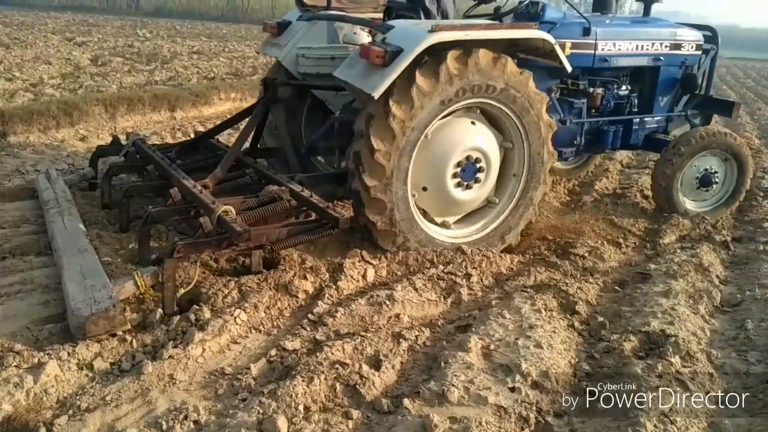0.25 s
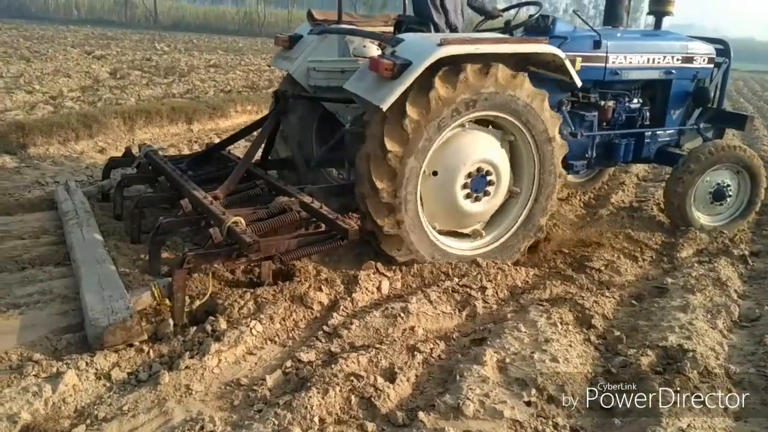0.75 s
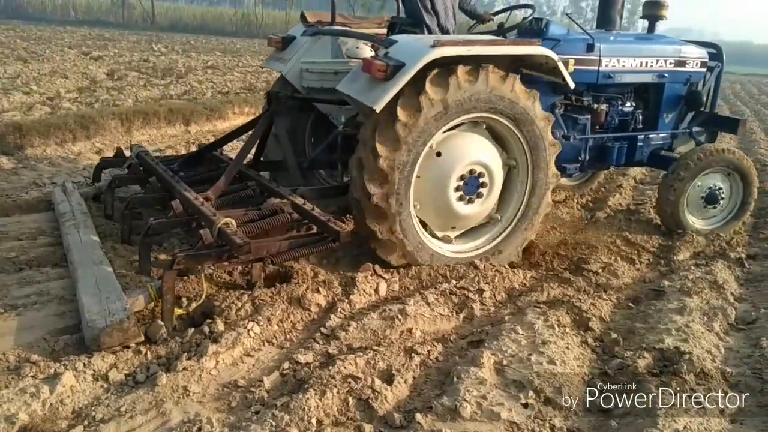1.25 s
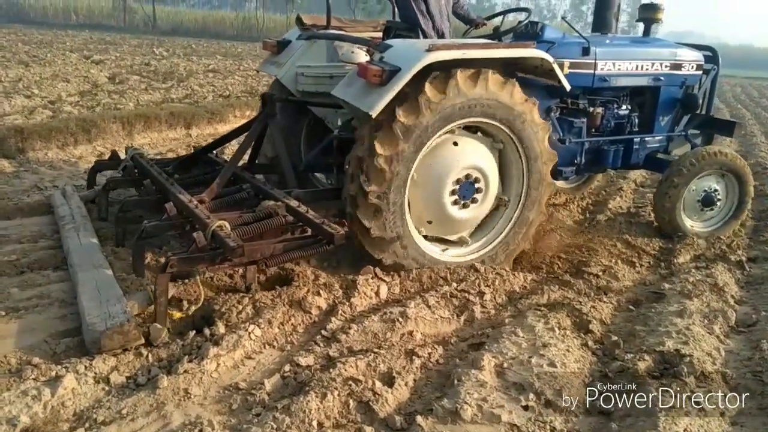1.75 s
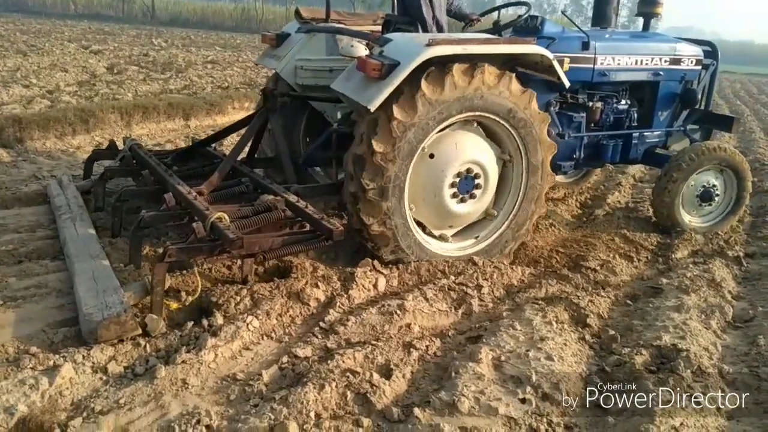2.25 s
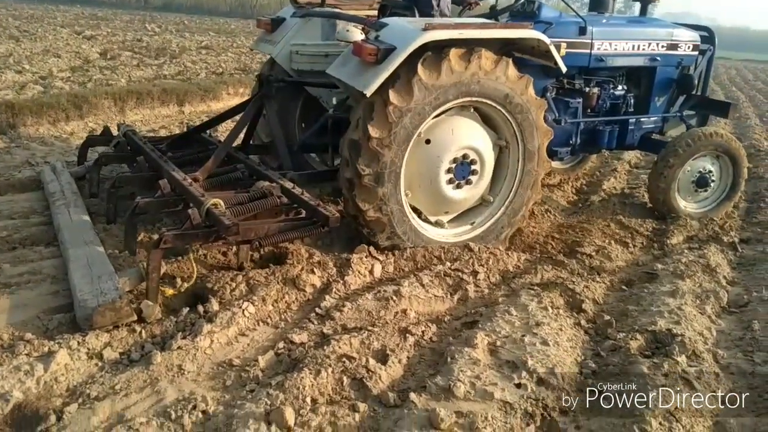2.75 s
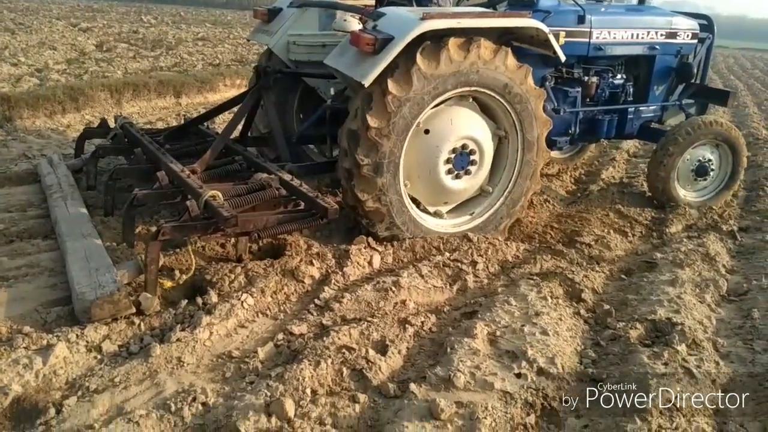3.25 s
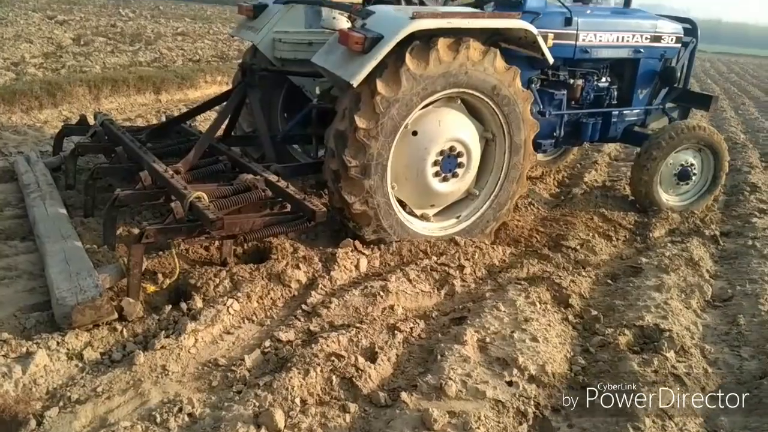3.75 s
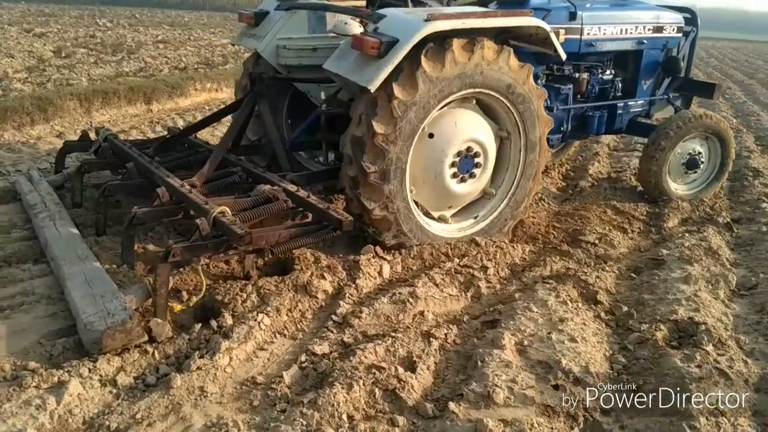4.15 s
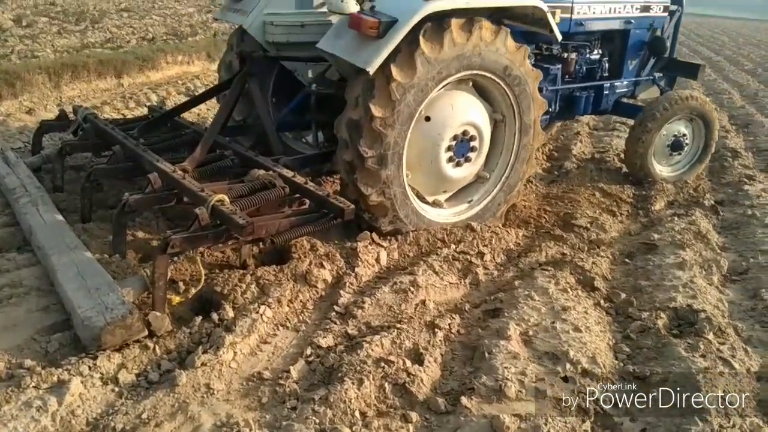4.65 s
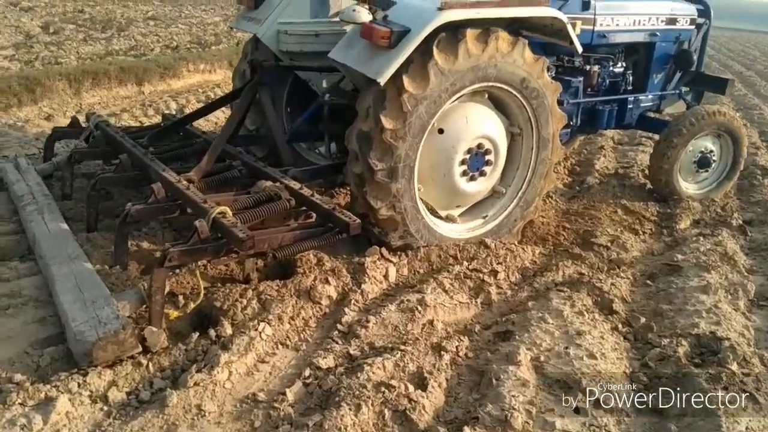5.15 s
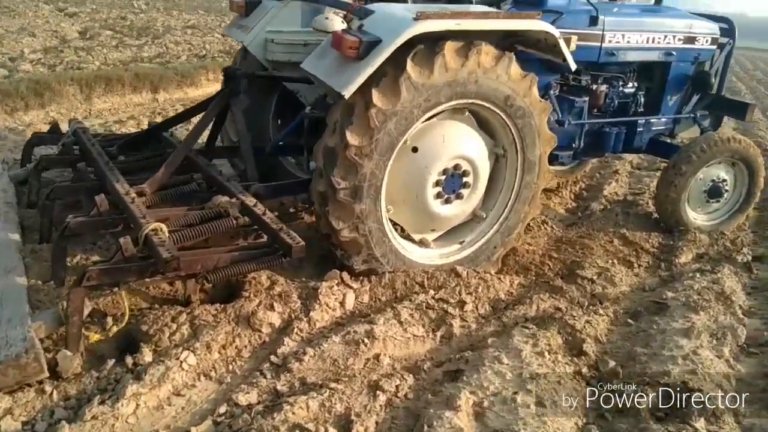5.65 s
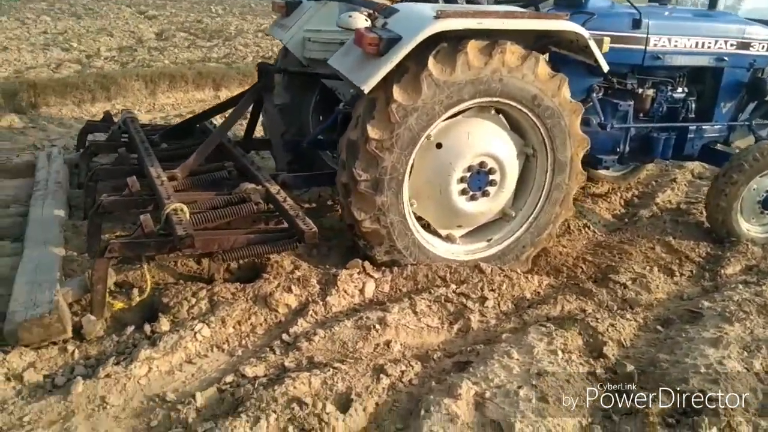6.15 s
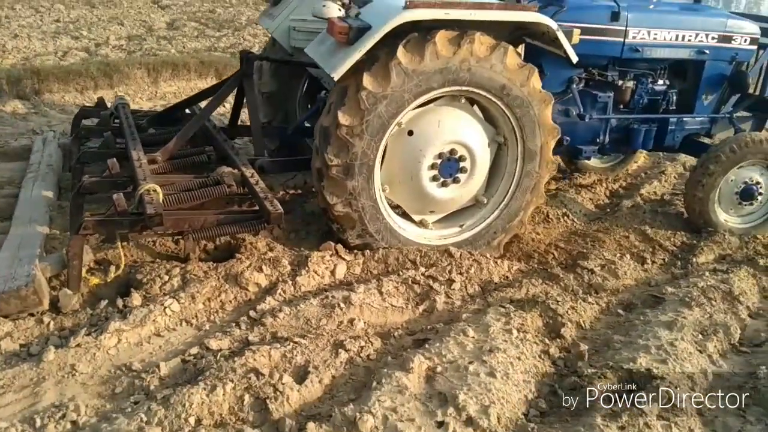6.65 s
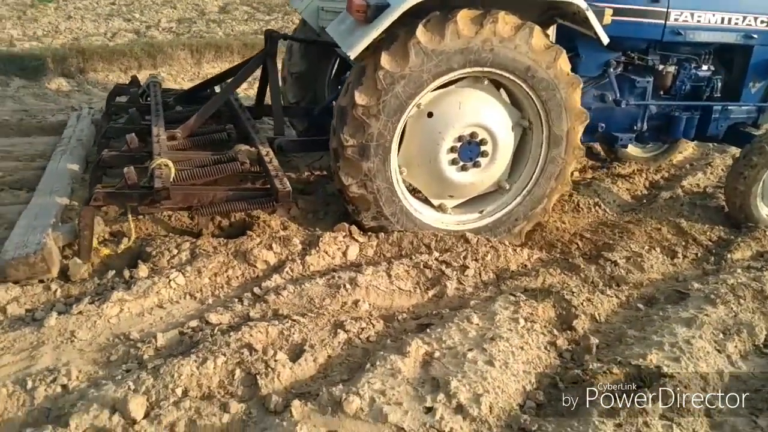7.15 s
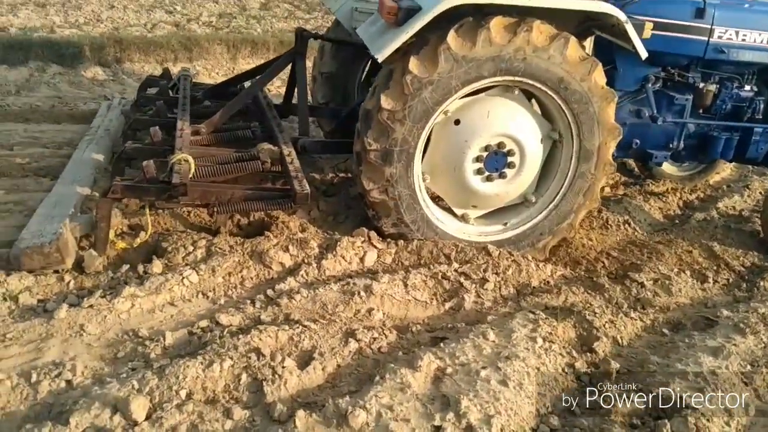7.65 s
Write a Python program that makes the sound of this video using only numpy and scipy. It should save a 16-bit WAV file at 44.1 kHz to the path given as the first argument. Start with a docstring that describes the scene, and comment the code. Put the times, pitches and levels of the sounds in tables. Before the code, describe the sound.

Close outdoors, a small diesel tractor works steadily with sharp metallic ticking, hard knocks and low booming exhaust puffs. Dry soil crumbles underneath and a few faint links clink early. After two seconds the load eases and the engine sags, then surges quickly to its fastest rattle before gradually winding down toward a slow, lumpy idle.

```python
"""On a dry field, a three-cylinder diesel tractor drags a tined cultivator.
It pulls under load, coasts down, revs up again and sinks towards idle. Each firing excites an injector
tick, a combustion knock and an exhaust puff by shaping impulses and noise; sines give drone and whine.
A steel cover and loose links ring as decaying modes, and filtered random impacts are crumbling clods."""
import sys
import numpy as np
from scipy import signal
from scipy.io import wavfile
from scipy.ndimage import uniform_filter1d

SR = 44100
rng = np.random.default_rng(int(sys.argv[2]) if len(sys.argv) > 2 else 0)


def to_wav(s):
    """Save 16-bit WAV."""
    ch = np.atleast_2d(s).T  # columns
    pcm = np.round(np.clip(ch, -1, 1) * 32767)  # PCM
    wavfile.write(sys.argv[1], SR, pcm.astype(np.int16))


N = 349272
TIME = np.arange(N) / SR


def amp(db):
    """Decibel law: 20 dB is a factor of ten in amplitude."""
    return 10 ** (np.asarray(db) / 20)


def evened(x):
    """Normalisation: scales to rms 1."""
    return x / np.sqrt(np.mean(x ** 2) + 1e-20)


def curves(rows):
    """Linear interpolation: the columns of a table, joined by straight lines in time."""
    s, *columns = np.transpose(rows)
    return [np.interp(TIME, s, c) for c in columns]


def read(points, hz):
    """Logarithmic frequency scale: interpolates a spectrum in dB along it."""
    f, db = np.transpose(points)
    return np.interp(np.log(hz + 1), np.log(f), db)


def colour(x, points):
    """Minimum-phase filtering: a causal filter of given spectrum, falling away steeply outside it."""
    hz = abs(np.fft.fftfreq(8192, 1 / SR)) + 1
    octaves_outside = abs(np.log2(hz / np.clip(hz, points[0][0], points[-1][0])))
    gain_db = np.maximum(read(points, hz) - 24 * octaves_outside, -100)
    # the Hilbert transform of the log gain supplies the phase
    response = np.exp(np.conj(signal.hilbert(np.log(amp(gain_db)))))
    taps = np.fft.ifft(response).real[:4096]
    return evened(signal.oaconvolve(x, taps)[:N])


def ring(x, modes):
    """Modal superposition: drives decaying sines; each mode's dB is its share of the energy."""
    t = TIME[:SR // 2]
    response = np.zeros(len(t))
    for hz, width_hz, db in modes:
        decay = np.exp(-np.pi * width_hz * t)
        response += amp(db) * np.sqrt(width_hz) * decay * np.sin(2 * np.pi * hz * t)
    return signal.oaconvolve(x, response)[:N]


def fade(x, seconds):
    """First-order relaxation: each impulse becomes an exponential decay of the same area."""
    r = np.exp(-1 / (seconds * SR))
    return signal.lfilter([1 - r], [1, -r], x)


def grit(per_second, spread_db):
    """Random impacts: tiny impulses at chance moments, with exponentially scattered levels in dB."""
    size = amp(spread_db * np.minimum(rng.exponential(1, N), 4))
    struck = rng.random(N) < per_second / SR
    return evened(size * rng.standard_normal(N) * struck)


def burst(hits, rise, crack, tail, tail_db, alike):
    """Dense modal decay: noise under a short crack and a tail, times in s.

    The share `alike` (0-1) of each cylinder's ring repeats at every blow."""
    def envelope(x):
        energy = fade(x, crack) + amp(tail_db) ** 2 * fade(x, tail)
        return np.sqrt(abs(fade(energy, rise)))
    fresh = envelope((hits ** 2).sum(0)) * rng.standard_normal(N)
    size = SR // 8
    own_rings = envelope(signal.unit_impulse(size)) * rng.standard_normal((len(hits), size))
    repeated = signal.oaconvolve(hits, own_rings, axes=1).sum(0)[:N]
    alike = np.clip(alike, 0, 1)
    return np.sqrt(1 - alike) * evened(fresh) + np.sqrt(alike) * evened(repeated)


# Speed of the engine. Columns: time_s, firing_rate_hz
FIRING_RATE = [(0.0, 30.35), (0.24, 30.63), (0.61, 27.73), (1.02, 27.72), (1.25, 28.97), (1.73, 27.55),
               (2.27, 27.53), (3.21, 20.56), (3.35, 19.06), (3.55, 21.64), (3.77, 31.74), (3.91, 33.04),
               (4.54, 34.86), (5.06, 35.23), (5.31, 34.47), (6.64, 23.48), (6.93, 20.46), (7.93, 12.7)]
CRANK_START = -.127  # firings


def crank():
    """Phase accumulation: firing rate, and its running integral as a count of firings."""
    rate, = curves(FIRING_RATE)
    return rate, np.cumsum(rate) / SR + CRANK_START


# Fuel fed to the engine. Columns: time_s, load_0_to_1
FUEL_LOAD = [(0, 0.89), (.8, 0.79), (1.3, 0.93), (2.05, 0.86), (2.28, 0.59), (2.34, 0.14), (3.42, 0.18),
             (3.63, 0.76), (3.78, 0.62), (4.02, 0.67), (4.4, .72), (5.25, 0.6), (5.55, 0.2), (5.95, 0.3),
             (6.3, 0.23), (7, 0.2), (7.9, 0.03)]
# Firings whose strength departs from the rest. Columns: time_s, extra_db
HARD_FIRINGS = [(.07, -1), (.268, 1.5), (.791, 3.5), (.9, 2), (1.007, 1.5), (1.22, 3.5), (1.324, 1.5),
                (3.467, 2.5), (3.516, 3), (3.716, 3.5), (4.439, 2), (4.5, 1.5), (7.784, 1.5), (7.855, 1.5)]


def working_point():
    """Operating state: load 0-1, nearness to full speed 0-1, and the gain of the marked firings."""
    rate, = curves(FIRING_RATE)
    load = np.clip(curves(FUEL_LOAD)[0], 0, 1)
    racing = np.clip((rate - 30.5) / 3, 0, 1)
    extra_db = np.zeros(N)
    for s, db in HARD_FIRINGS:
        extra_db[abs(TIME - s) < .014] = db
    return load, racing, amp(extra_db)


CRUISE_HZ = 28  # firing rate at which the speed term is zero


def loudness(law):
    """Source-level law: a part's gain in dB, linear in load and in octaves of speed."""
    unloaded_db, load_db, doubling_db = law
    (rate,), (load,) = curves(FIRING_RATE), curves(FUEL_LOAD)
    return unloaded_db + load_db * load + doubling_db * np.log2(rate / CRUISE_HZ)


# Character of each cylinder, one row each; levels are relative, before the unevenness factor in blows().
# Columns: lag_firings, tick_db, second_impact_db, knock_db, load_hardening_db, head_ring_db,
# cover_db, exhaust_db, exhaust_lag_firings
CYLINDERS = [(.006, 8.5, 3.5, 3.5, 2.5, -24, 3, -0.5, .82), (-.015, 9.5, 9, 4.5, 4, -29, -6, 0, .72),
             (.001, 13, 6, 7.5, 1, 5, 7, 0.5, .7)]
# factor on the dB differences between cylinders: unloaded, taken off by full load, added at full speed
UNEVEN_IDLE, UNEVEN_LOAD, UNEVEN_RACING = 1.38, 1, 0.18


def blows(lags, sizes_db, delay, jitter, scatter_db):
    """Cyclic excitation: impulses per cylinder, with delay and jitter in s, less even at light load.

    Dividing by the square root of the rate keeps the mean power the same at every speed."""
    rate, turns = crank()
    load, racing, _ = working_point()
    k = np.arange(int(turns[-1]) + 1)
    cylinder = k % len(CYLINDERS)
    early, strong = rng.standard_normal((len(k), 2)).T
    s = np.interp(k + lags[cylinder], turns, TIME) + delay + jitter * early
    at = np.clip((s * SR).astype(int), 0, N - 1)
    uneven = UNEVEN_IDLE - UNEVEN_LOAD * load[at] + UNEVEN_RACING * racing[at]
    sizes = amp(np.outer(uneven, sizes_db))
    sizes /= np.sqrt(np.mean(sizes ** 2, axis=1, keepdims=True))
    out = np.zeros((len(CYLINDERS), N))
    out[cylinder, at] = sizes[k, cylinder] * amp(scatter_db * strong) / np.sqrt(rate[at])
    return out


# Tick spectra below and at full speed, relative. Columns: frequency_hz, level_db_per_hz
TICK = [(4000, -54), (6800, -15), (7700, -5), (8600, 1.5), (9900, -3), (11300, -2), (12800, -5),
        (14200, -10), (15500, -13.5)]
TICK_RACING = [(4000, -21), (6800, -12), (7900, -3.5), (8600, 3), (9800, -2), (11200, 2), (12800, -3),
               (14300, -6.5), (15500, -8)]
# Swell of the treble ticks. Columns: time_s, extra_db
TREBLE_SWELL = [(0, 0.7), (.62, -0.2), (1.3, -0.3), (3.66, 0.9), (4.02, -2.2), (4.48, 0.1), (5.28, .6),
                (6.15, -1.1), (7.45, 0.1), (7.9, 2)]
# Gain law. Columns: unloaded_db, full_load_extra_db, extra_db_per_speed_doubling
TICK_LAW = (-41.5, 10, 3)


def injectors():
    """Impact excitation: bright double ticks milliseconds apart, then a valve seats softly."""
    lag, tick_db, second_db, _, harden_db, *_ = np.transpose(CYLINDERS)
    load, racing, hard = working_point()
    harden = amp(harden_db[:, None] * load)  # load shifts the weight to the first impact
    first = blows(lag, tick_db, delay=.0007, jitter=.0004, scatter_db=1.1) * hard * harden
    second = blows(lag + .085, second_db, delay=.0042, jitter=.0008, scatter_db=1.8)
    second = second * amp(2.5 - 0.98 * load) / harden
    valve = blows(lag + 0.73, tick_db, delay=0.0012, jitter=.003, scatter_db=5.0)
    valve = valve * amp(-11 + 1 * racing)
    soft = burst(first + valve, rise=0.0022, crack=0.003, tail=0.0068, tail_db=-3.5, alike=0.6)
    snap = burst(second, rise=0.00066, crack=0.00067, tail=0.0071, tail_db=-3.5, alike=0.66)
    ticks = evened(soft + amp(-4) * snap)
    # the valve gear chatters more at speed
    chatter = grit(2200, spread_db=-0.5) * evened(crank()[0] ** 1.55)
    drive = ticks + amp(-6.5) * chatter
    coloured = np.sqrt(1 - racing) * colour(drive, TICK) + np.sqrt(racing) * colour(drive, TICK_RACING)
    return amp(loudness(TICK_LAW) + curves(TREBLE_SWELL)[0]) * coloured


# Block spectra under load, coasting and at full speed, relative. Columns: frequency_hz, level_db_per_hz
KNOCK_LOADED = [(400, -20), (900, -3.5), (1250, -7), (1500, 0), (1850, -9), (2100, -1.5), (2400, -4.5),
                (2800, 1), (3100, -2), (3650, -5), (4100, -8.5), (4750, -3), (7000, -4), (10000, -12)]
KNOCK_COASTING = [(400, -19), (850, -10), (1220, -9.5), (1450, -1), (2050, -3.5), (2600, -2), (3000, -5.5),
                  (3600, 0.5), (4100, -12), (4850, -2), (7000, -5.5), (10000, -0.5)]
KNOCK_RACING = [(400, -20), (900, -8), (1250, -3.5), (1560, 1), (1780, 1), (2050, -5.5), (2550, 0.5),
                (3150, -3), (3600, -1.5), (4100, -6), (4700, 0), (5900, -7), (7000, -6.5), (10000, -7)]
# Modes of the cylinder head. Columns: frequency_hz, width_hz, energy_share_db
HEAD_MODES = [(2823, 70, -5.5), (2070, 77, -7), (3400, 74, -25), (6030, 130, -4)]
# Gain law. Columns: unloaded_db, full_load_extra_db, extra_db_per_speed_doubling
KNOCK_LAW = (-46, 8.5, 3)


def combustion():
    """Structure-borne sound: firing knock, then piston slap, excite the block; load rings the head."""
    lag, _, _, knock_db, harden_db, head_db, *_ = np.transpose(CYLINDERS)
    load, racing, hard = working_point()
    knock = blows(lag, knock_db, delay=0.001183, jitter=.0004, scatter_db=1.58)
    knock = knock * hard * amp(1.5 + (1.5 + harden_db[:, None]) * load)
    slap = blows(lag + .085, knock_db, delay=.0042, jitter=.0008, scatter_db=1.6)
    slap = slap * amp(-0.1 - 2.1 * load)
    sharp = burst(knock + slap, rise=0.0024, crack=0.0025, tail=0.015, tail_db=0.5, alike=0.18)
    # the lower modes of the block ring longer, and the timing gears keep them going between blows
    long = burst(knock + slap, rise=0.0024, crack=0.009, tail=0.018, tail_db=-6.5, alike=0.64)
    gears = amp(3) * grit(4000, spread_db=-1.5)
    low = evened(fade(fade(long + gears, .00007), .00007))
    drive = sharp + amp(-6.5) * low
    states = [(load * (1 - racing), KNOCK_LOADED),
              ((1 - load) * (1 - racing), KNOCK_COASTING),
              (racing, KNOCK_RACING)]
    block = sum(np.sqrt(share) * colour(drive, spectrum) for share, spectrum in states)
    head_hits = blows(lag, head_db, delay=.003, jitter=0.00054, scatter_db=-0.5).sum(0)
    head = evened(ring(head_hits, HEAD_MODES))
    return amp(loudness(KNOCK_LAW)) * (block + amp(-7.0) * load * (1 - 0.49 * racing) * head)


# Strength of the first multiples of the firing rate, relative. Column: level_db
ORDERS_DB = [-9, -2, -1, -18, -10.5, -7.5]
# Response of the pipe, then puff and rasp spectra when lugging and when light or fast; all relative.
# Columns: frequency_hz, level_db (per hz for puff and rasp)
PIPE = [(25, -25), (44, -22), (55, -2), (68, 1), (85, 2), (110, 1.5), (140, -9), (190, -19), (250, -18)]
PUFF = [(20, -26), (65, -21), (95, -4), (112, 0.5), (135, 3.5), (158, -8.5), (200, -1.5), (245, -19.5),
        (330, -30), (700, -30)]
PUFF_LIGHT = [(20, -21), (65, -8.5), (95, -3.5), (115, 3.5), (135, 4), (158, -3.5), (200, -7.5), (245, -18),
              (330, -23), (700, -25)]
RASP = [(150, -16.5), (260, -2.5), (380, 3), (430, -6), (505, -4.5), (570, 2), (700, 1), (800, 0),
        (900, -21), (1200, -9), (2000, -17.5)]
RASP_LIGHT = [(150, -27), (260, -3), (310, -3.5), (385, 6), (450, 2), (505, 0.5), (550, 7), (650, 2),
              (780, 4.5), (900, 2), (1200, 2.5), (2000, -24.5)]
# Gain laws. Columns: unloaded_db, full_load_extra_db, extra_db_per_speed_doubling
DRONE_LAW = (-59, 12.5, 2)
PUFF_LAW = (-54.5, 13.5, 7.5)
RASP_LAW = (-55, 13, 2)
# the pipe booms on one note: centre (Hz), width (Hz), gain (dB)
PIPE_NOTE_HZ, PIPE_WIDTH_HZ, PIPE_BOOM_DB = 79, 5.4, 5
# change at full speed, where the puffs run together (dB)
DRONE_RACING_DB, PUFF_RACING_DB = -2, -2


def exhaust():
    """Pipe resonance and pulsed flow: firing orders boom at the pipe's note; gas puffs and rasps."""
    *_, puff_db, lag = np.transpose(CYLINDERS)
    rate, turns = crank()
    load, racing, _ = working_point()
    drone = np.zeros(N)
    for k, order_db in enumerate(ORDERS_DB, 1):
        boom_db = PIPE_BOOM_DB * np.exp(-((k * rate - PIPE_NOTE_HZ) / PIPE_WIDTH_HZ) ** 2)
        blur_db = -6 * racing * (k > 2)  # at full speed the higher orders fade
        gain = amp(order_db + read(PIPE, k * rate) + boom_db + blur_db)
        drone += gain * np.sqrt(2) * np.cos(2 * np.pi * (k * turns + rng.random()))
    hits = blows(lag, puff_db, delay=0, jitter=0.00019, scatter_db=0.3)
    pulses = evened(hits.sum(0))
    gas = burst(hits, rise=0.0096, crack=0.018, tail=0.046, tail_db=-5.5, alike=0.58)
    lugging = load * (1 - racing)
    heavy, light = np.sqrt(lugging), np.sqrt(1 - lugging)
    push = amp(-3 + 2.1 * lugging) * pulses + amp(0.5) * gas  # hard work sharpens each puff
    puffs = heavy * colour(push, PUFF) + light * colour(push, PUFF_LIGHT)
    rush = gas + amp(-4.0) * grit(2500, spread_db=4.0) + amp(-26) * pulses
    rasp = heavy * colour(rush, RASP) + light * colour(rush, RASP_LIGHT)
    drone_db = loudness(DRONE_LAW) + DRONE_RACING_DB * racing
    puffs_db = loudness(PUFF_LAW) + PUFF_RACING_DB * racing
    return amp(drone_db) * drone + amp(puffs_db) * puffs + amp(loudness(RASP_LAW)) * rasp


# Modes of the steel cover. Columns: frequency_hz, width_hz, energy_share_db
COVER_MODES = [(991.3, 4.3, 16), (1050, 43, 13), (1054, 16, -1)]
# The cover's ring swells and sinks. Columns: time_s, extra_db
COVER_SWELL = [(0, 3.5), (1.8, -3.5), (2.4, -0.5), (3.6, -3), (4.6, 1.5), (5.0, 6), (5.75, 0.5),
               (6.55, 2.5), (7.1, -3)]
# Gain law. Columns: unloaded_db, full_load_extra_db, extra_db_per_speed_doubling
COVER_LAW = (-48, -6, 4)


def cover():
    """Forced resonance: firings, one cylinder's hardest, and steady noise keep a steel cover singing."""
    lag, *_, cover_db, _, _ = np.transpose(CYLINDERS)
    swell_db, = curves(COVER_SWELL)
    hits = evened(blows(lag, cover_db, delay=.01, jitter=0.00034, scatter_db=4.5).sum(0))
    rung = ring(hits + amp(-4.0) * rng.standard_normal(N), COVER_MODES)
    # its swing stays even from blow to blow
    rung /= np.sqrt(abs(uniform_filter1d(rung ** 2, size=SR // 9)) + 1e-9)
    return amp(loudness(COVER_LAW) + swell_db) * rung


MESH_PER_FIRING = 45.2  # tooth meshes per firing
# Gain law. Columns: unloaded_db, full_load_extra_db, extra_db_per_speed_doubling
WHINE_LAW = (-58.5, -3.5, 30)


def gear_whine():
    """Tooth-mesh tone: a sine locked to the crank, with slow random ripples in phase and level."""
    _, turns = crank()
    ripple, flutter = (evened(fade(fade(z, 0.023), 0.023)) for z in rng.standard_normal((2, N)))
    tone = np.sin(2 * np.pi * (MESH_PER_FIRING * turns + 0.11 * ripple))
    return amp(loudness(WHINE_LAW) + 2 * flutter) * tone


# Spectrum of crumbling soil, relative. Columns: frequency_hz, level_db_per_hz
SOIL = [(20, 0), (60, -1), (250, -3.5), (700, 10.5), (1600, 5), (4000, -26), (9000, -26), (16000, 6.5)]
# Gain law. Columns: unloaded_db, full_load_extra_db, extra_db_per_speed_doubling
SOIL_LAW = (-53.5, 6, 6.5)
# Blows on the loose links, relative. Columns: start_s, level_db
CLINKS = [(.408, -23.5), (0.529, -23), (0.546, -26), (1.232, -31), (1.591, -25), (2.049, -27)]
# Modes of a loose link. Columns: frequency_hz, width_hz, energy_share_db
LINK_MODES = [(11940, 21, -1.5), (11000, 16, -3), (9400, 35, -16)]


def cultivator():
    """Granular noise and free vibration: dry clods crumble around the tines; loose links clink."""
    taps = np.zeros(N)
    for s, db in CLINKS:
        taps[int(s * SR)] = amp(db)
    links = ring(taps, LINK_MODES) / np.sqrt(LINK_MODES[0][1])
    clods = colour(grit(1500, spread_db=5.0), SOIL)
    return amp(loudness(SOIL_LAW)) * clods + amp(-1.0) * links


def scene():
    """Superposition: the pressures of all sources add."""
    engine = injectors() + combustion() + exhaust() + cover() + gear_whine()
    return (engine + cultivator())[None]


EDGE_HZ = 15650  # upper band limit


def record(dry):
    """Band limitation: a linear-phase low-pass filter removes the highest treble."""
    taps = signal.firwin(511, EDGE_HZ, window=("kaiser", 9), fs=SR)
    return signal.oaconvolve(dry, taps[None], "same")


dry = scene()
out = record(dry)
to_wav(out)
```